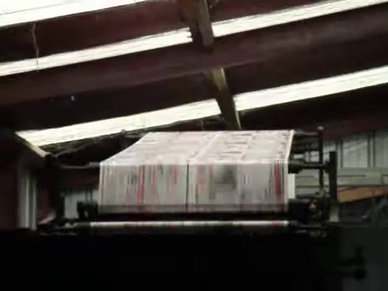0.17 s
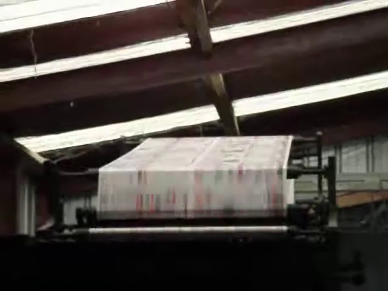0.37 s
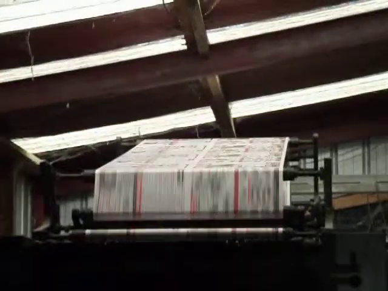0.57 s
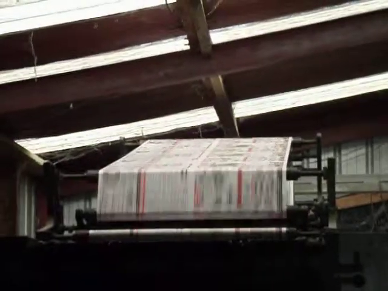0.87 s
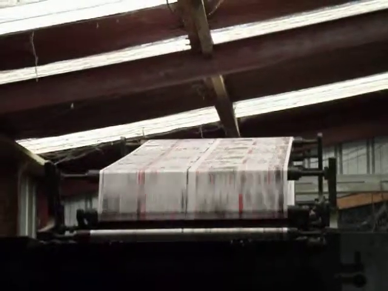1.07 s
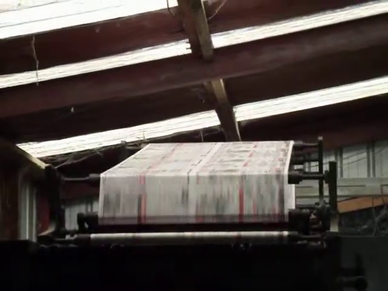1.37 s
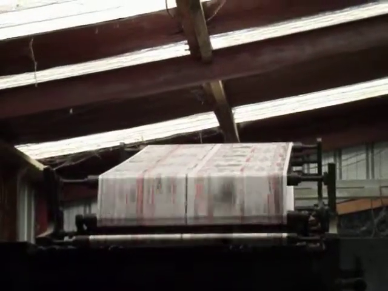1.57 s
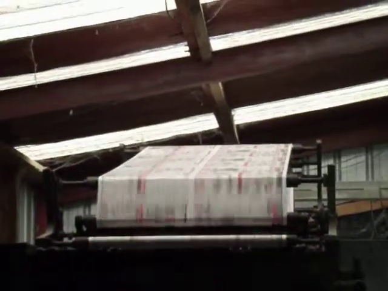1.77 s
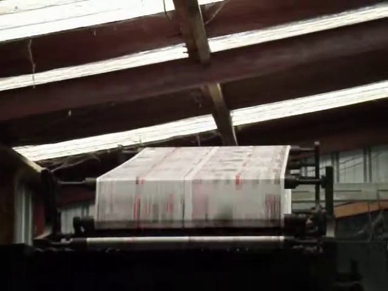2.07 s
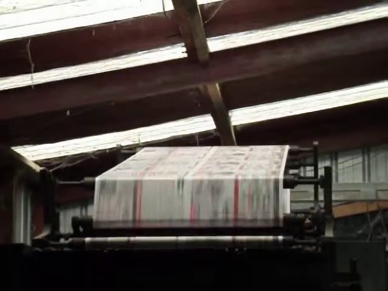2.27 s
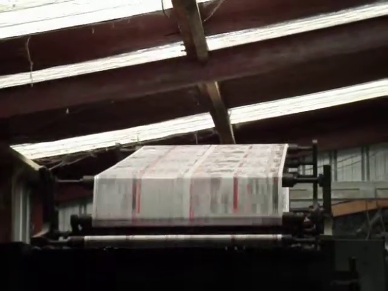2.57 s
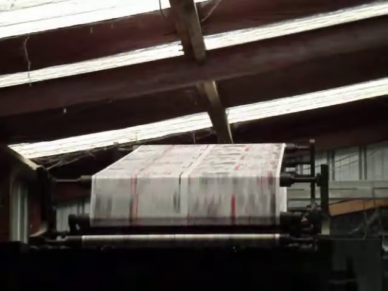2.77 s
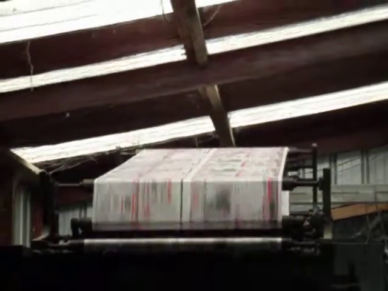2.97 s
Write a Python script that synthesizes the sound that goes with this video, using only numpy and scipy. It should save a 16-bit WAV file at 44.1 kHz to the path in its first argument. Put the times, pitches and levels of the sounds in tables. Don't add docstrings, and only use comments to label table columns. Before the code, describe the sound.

A large printing press runs at constant speed. After under 0.1 s of silence, its dense loud roar cuts in and holds to about 3 s. Rapid dull low knocks repeat in a pattern about 3.5 times a second over frame rumble. Gears hum; a dry, high squeal wavers, stronger from about 1.4 s. Big shed, small mono camera microphone, little treble, clipped peaks.

```python
import sys
import numpy as np
from scipy import signal
from scipy.fft import rfft, irfft
from scipy.io import wavfile
from scipy.ndimage import uniform_filter1d

SR = 44100
rng = np.random.default_rng(int(sys.argv[2]) if len(sys.argv) > 2 else 0)


def to_linear_factor(level_db):
    exponent = np.asarray(level_db, float) / 20
    return 10 ** exponent


def generate_wav(sig):
    pcm = np.round(np.clip(np.atleast_2d(sig).T, -1, 1) * 32767).astype(np.int16)
    wavfile.write(sys.argv[1], SR, pcm)


N = 138033
TURN_HZ = 3.5144
CAMERA_STEP = 4


def level(x, rms_db):
    return x * to_linear_factor(rms_db) / np.sqrt(np.mean(x ** 2))


def shape(table, hz):
    pitch_hz, level_db = np.array(table).T
    return to_linear_factor(np.interp(np.log(hz + 1), np.log(pitch_hz), level_db))


def walk(rate_hz):
    hold = int(SR / rate_hz)
    steps = np.repeat(rng.standard_normal(N // hold + 1), hold)
    slewed = uniform_filter1d(uniform_filter1d(steps, hold), hold)[:N]
    return (slewed - slewed.mean()) / slewed.std()


def tone(pitch_hz, rms_db):
    cycles = np.cumsum(pitch_hz) / SR + rng.random()
    return np.sqrt(2) * to_linear_factor(rms_db) * np.sin(2 * np.pi * cycles)


# crest_s (burst centre, into the turn), pitch_hz, peak_db
TURN_KNOCKS = [(0.0075, 195, -19), (0.015, 305, -20), (0.0306, 270, -19), (0.0344, 150, -19),
               (0.0452, 390, -20), (0.0454, 225, -22), (0.0589, 145, -19), (0.0669, 325, -19),
               (0.0672, 215, -11), (0.0903, 135, -22), (0.0907, 200, -16), (0.1095, 220, -22),
               (0.1182, 195, -15), (0.1255, 245, -19), (0.1356, 150, -22), (0.1505, 205, -20),
               (0.1555, 330, -21), (0.1659, 110, -24), (0.1696, 245, -17), (0.1706, 330, -19),
               (0.1719, 165, -19), (0.1966, 240, -15), (0.2039, 335, -20), (0.205, 165, -22),
               (0.2672, 205, -23), (0.284, 140, -25)]


def knocks():
    ring_cycles, scatter_db, jitter_s = 1.2, .8, .00015
    half, turns = 2048, 13
    t = np.arange(-half, half) / SR
    out = np.zeros(N + 4 * half)
    for crest_s, pitch_hz, peak_db in TURN_KNOCKS:
        spread_s = ring_cycles / np.sqrt(pitch_hz * 200)
        burst = np.exp(-.5 * (t / spread_s) ** 2) * np.cos(2 * np.pi * pitch_hz * t)
        for turn in range(turns):
            late, loud = rng.standard_normal(2)
            i = int((crest_s + turn / TURN_HZ + jitter_s * late) * SR)
            if 0 <= i < N + half:
                out[i:i + len(t)] += to_linear_factor(peak_db + scatter_db * loud) * burst
    return out[half:half + N]


# pitch_hz, level_db (per Hz)
RUMBLE_SPECTRUM = [(30, -20), (75, -14), (100, -6), (200, -3), (350, -1), (520, -4), (900, -13),
                   (2500, -60)]


def rumble():
    size = round(SR / TURN_HZ)
    hz = np.arange(size // 2 + 1) * TURN_HZ
    turn = irfft(rfft(rng.standard_normal(size)) * shape(RUMBLE_SPECTRUM, hz), size)
    return level(np.resize(turn, N), -26.5)


# pitch_hz, rms_db, wander_hz, flutter_db
GEAR_TONES = [(76, -44.5, 1, -0.5), (105.4, -39, .3, 1.5), (329.2, -35.5, 3, 2.1),
              (615.6, -28.5, 1.15, 1.5), (538, -37.5, 2.2, 4), (633.6, -37.5, 1.1, 2), (707, -35.5, 4, 3.5),
              (882, -44.5, 3.1, 7.5), (1785, -37, 3.6, -1), (1900, -33.5, 10, 3.5), (1986, -31, 13, 2),
              (4120, -50.5, 20, 2), (5474, -65.5, 7, 1)]


def gears():
    out = np.zeros(N)
    for pitch_hz, rms_db, wander_hz, flutter_db in GEAR_TONES:
        out += tone(pitch_hz + wander_hz * walk(12), rms_db + flutter_db * walk(20))
    return out


# time_s, pitch_hz, rms_db
WHINE_PATH = [(.07, 2910, -29.5), (.3, 2915, -34.5), (.45, 2919, -28), (.58, 2942, -29.5), (.85, 2954, -29),
              (1.1, 2910, -37.5), (1.42, 2917, -22.5), (1.6, 2915, -26), (1.8, 2964, -29.5),
              (1.95, 2960, -24.5), (2.2, 2924, -22), (2.35, 2905, -24), (2.5, 2883, -31), (2.8, 2906, -26),
              (3.13, 2935, -24)]


def whine():
    wander_hz, flutter_db = 11.98, 3
    halo_hz, halo_width_hz, halo_db = 2910, 40, -26.5
    time_s, pitch_hz, rms_db = np.array(WHINE_PATH).T
    t, hz = np.arange(N) / SR, np.arange(N // 2 + 1) * SR / N
    pitch = np.interp(t, time_s, pitch_hz) + wander_hz * walk(30)
    loudness = np.interp(t, time_s, rms_db) + flutter_db * walk(40)
    squeal = tone(pitch, loudness)
    window = np.exp(-.5 * ((hz - halo_hz) / halo_width_hz) ** 2)
    halo = irfft(rfft(rng.standard_normal(N)) * window, N)
    return squeal + level(halo, halo_db)


# pitch_hz, level_db (per Hz)
ROAR_SPECTRUM = [(25, -27), (85, -20), (180, -7), (450, -8.5), (1000, -10.5), (1700, -12), (1900, -9.5),
                 (2900, -5.5)]
# pitch_hz, level_db
MIC_RESPONSE = [(2940, 1.5), (3110, -3.5), (3510, -13.5), (4010, -20), (4510, -29.5), (5000, -31.5),
                (5400, -22.5), (5520, -35)]


def roar():
    swell_db, throb_db, throb_s = .15, .03, .03
    shared_db, flicker_db = .34, 1.48
    hz, t = np.arange(N // 2 + 1) * SR / N, np.arange(N) / SR
    spectrum = rfft(rng.standard_normal(N)) * shape(ROAR_SPECTRUM, hz)
    throb = throb_db * np.cos(2 * np.pi * TURN_HZ * (t - throb_s))
    common = swell_db * walk(1.5) + throb
    walks = [walk(25) for _ in range(19)]
    out = np.zeros(N)
    for k in range(18):
        place = 2 * np.log2((hz + 1) / 25) - k
        band = irfft(spectrum * np.clip(1 - np.abs(place), 0, 1), N)
        own = shared_db * (walks[k] + walks[k + 1]) + flicker_db * walk(60)
        out += band * to_linear_factor(common + min(k / 8, 1) * own)
    in_band = hz < SR / CAMERA_STEP / 2
    return level(irfft(rfft(out) * shape(MIC_RESPONSE, hz) * in_band, N), -13.5)


def scene():
    return (knocks() + rumble() + gears() + whine() + roar())[None]


def low_pass(x):
    return signal.sosfilt(signal.butter(12, 15900, fs=SR, output="sos"), x)


def record(dry):
    first_clip, second_clip, offset = .7, .706, -.0017
    image_hz, starts_s = 5512, .0726
    kept = np.arange(N) % CAMERA_STEP == 0
    x = CAMERA_STEP * kept * np.clip(dry + offset, -first_clip, first_clip)
    x = signal.sosfiltfilt(signal.butter(14, image_hz, fs=SR, output="sos"), x)
    x = np.clip(x, -second_clip, second_clip)
    x = x * (np.arange(N) >= starts_s * SR)
    return low_pass(x)


dry = scene()
out = record(dry)
generate_wav(out)
```